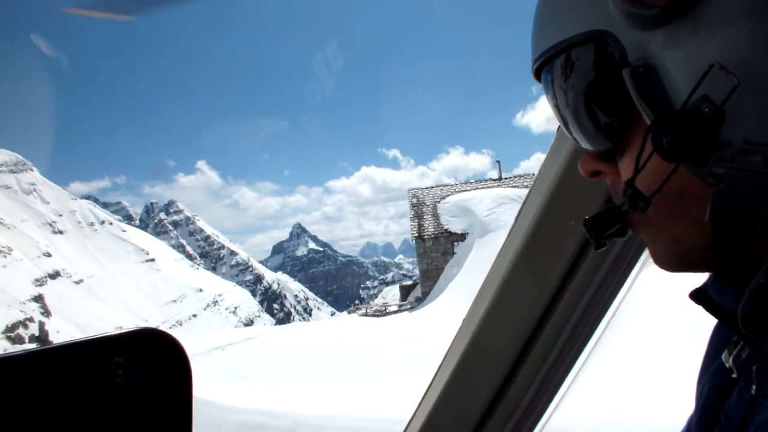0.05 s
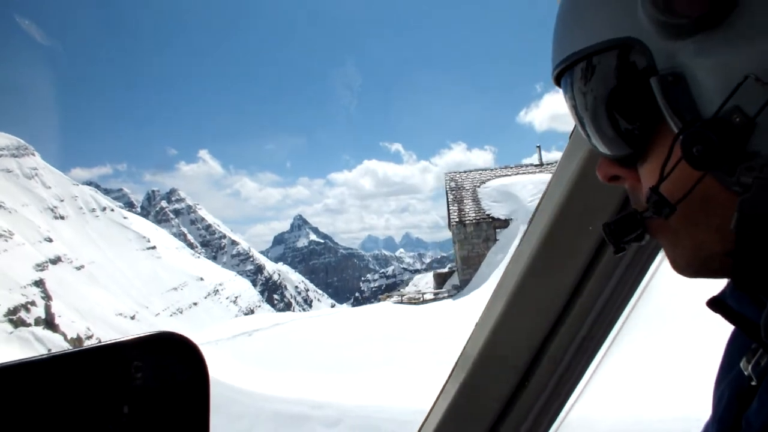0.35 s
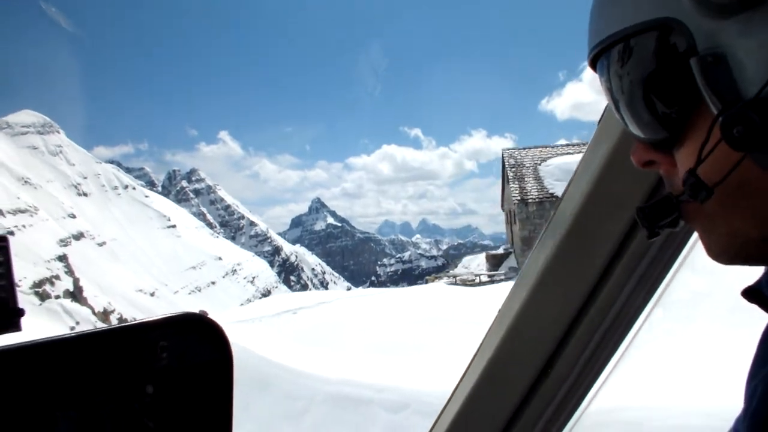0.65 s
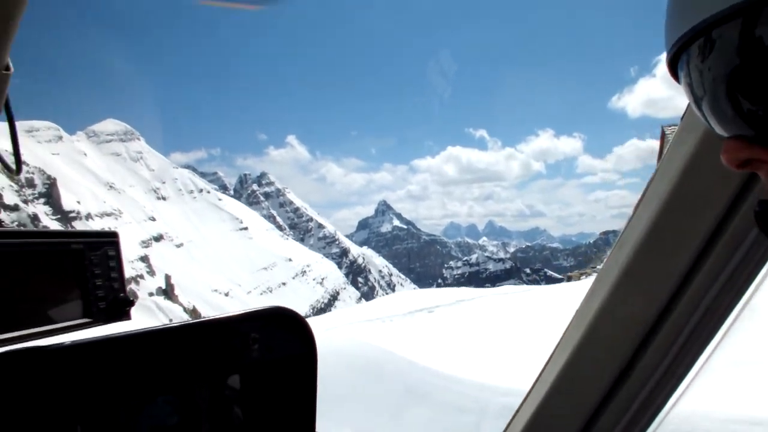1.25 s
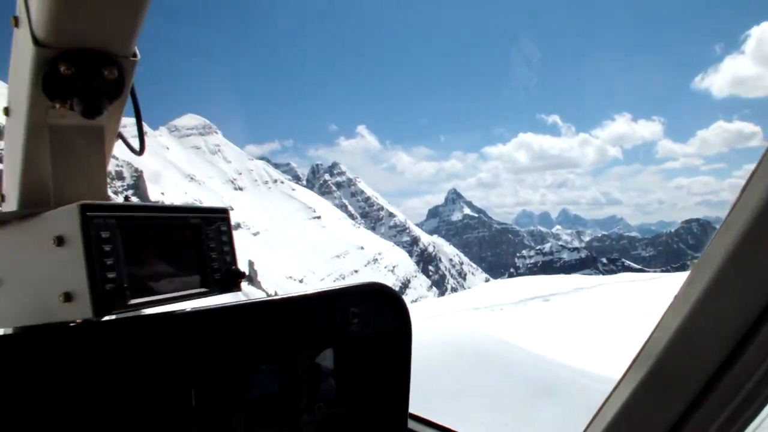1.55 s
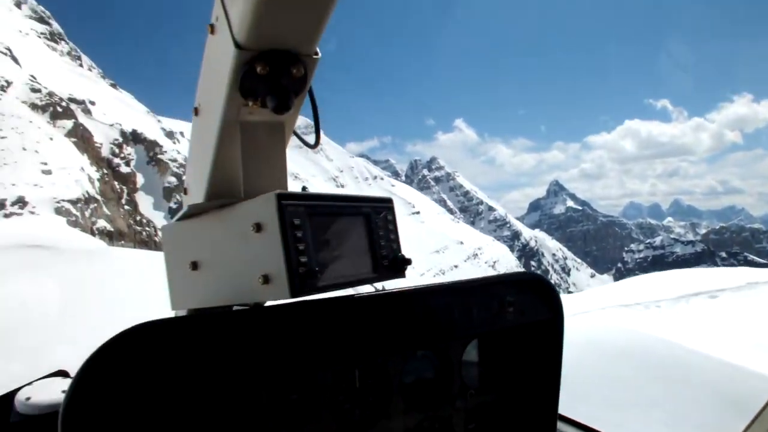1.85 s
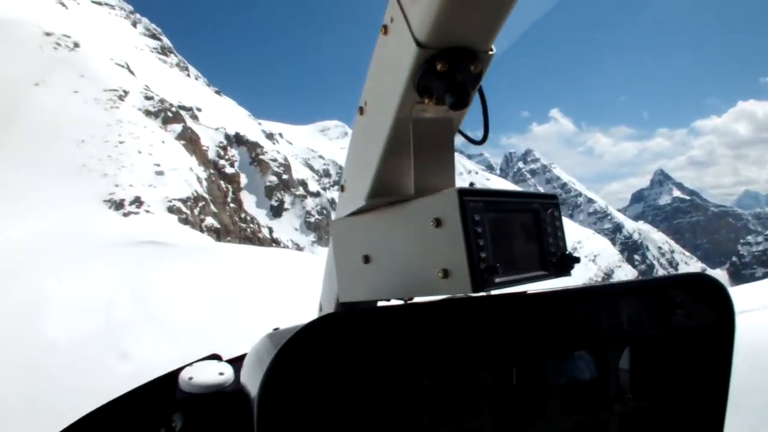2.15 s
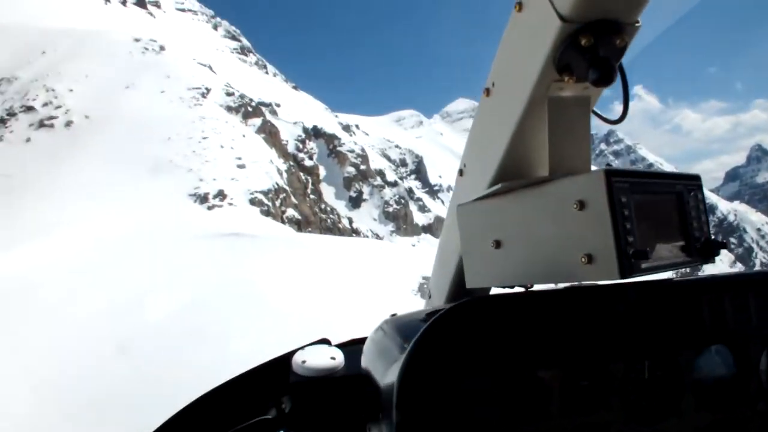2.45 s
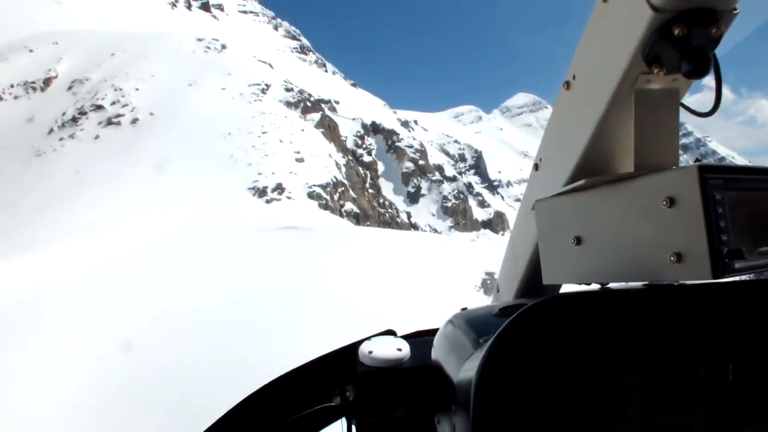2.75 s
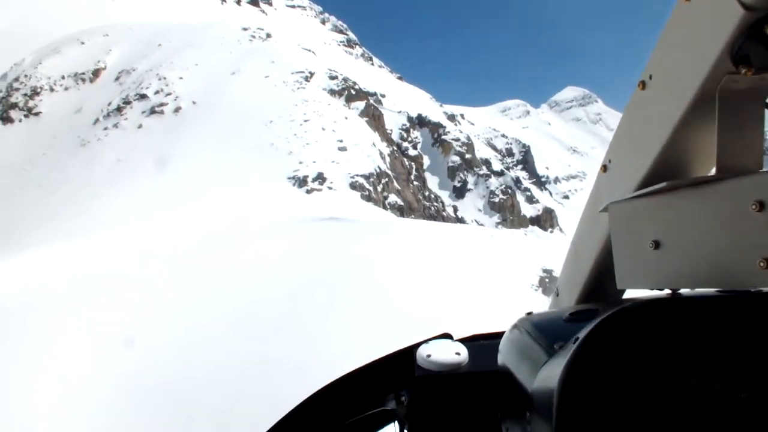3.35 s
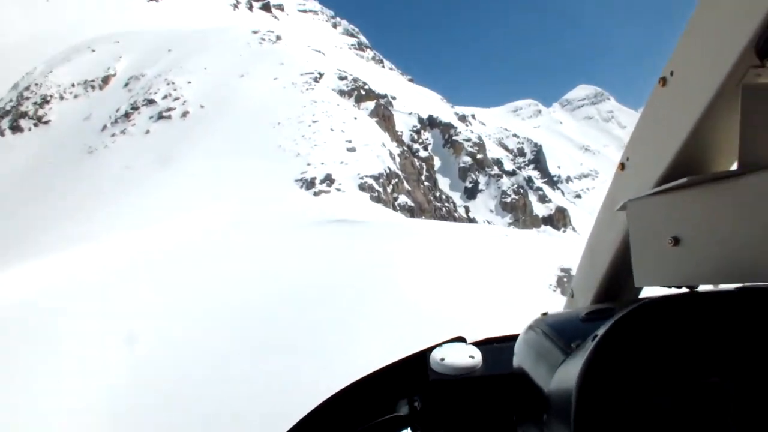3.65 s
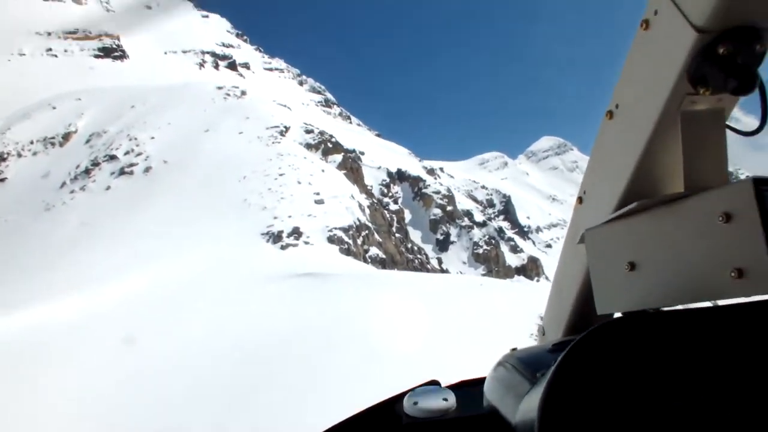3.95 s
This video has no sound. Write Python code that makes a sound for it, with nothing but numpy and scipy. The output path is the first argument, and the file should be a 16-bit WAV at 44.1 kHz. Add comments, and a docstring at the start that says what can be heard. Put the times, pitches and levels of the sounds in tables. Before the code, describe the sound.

A helicopter in flight, heard from inside the cabin: the rotor throbs steadily under a loud, pulsing roar of air and engine. Gear and turbine whines swell and fade, and something ticks faintly near the end.

```python
"""A helicopter's main rotor throbs, heard from inside the cabin in flight.
The tail rotor and drive shaft drone, gears whine and the turbine sings over a roar of air that
pulses with the blades. The whines swell and fade as the listener moves through standing waves,
the loud and quiet spots made by echoes in the cabin. Near the end, something ticks once."""
import sys
import numpy as np
from scipy import signal
from scipy.fft import rfft, irfft
from scipy.io import wavfile
from scipy.ndimage import uniform_filter1d

SR = 44100
rng = np.random.default_rng(int(sys.argv[2]) if len(sys.argv) > 2 else 0)


def log_audio(samples):
    """Write samples as a 16-bit WAV file to the path given in sys.argv[1]."""
    # one column per channel
    frames = np.atleast_2d(samples).T
    # limit to full scale, then quantise
    limited = np.clip(frames, -1, 1)
    pcm = np.round(limited * 32767).astype(np.int16)
    wavfile.write(sys.argv[1], SR, pcm)


N = 176400


def amp(db):
    """Turns decibels into a gain to multiply by."""
    return 10 ** (np.asarray(db) / 20)


def unit(x):
    """Scales a signal to an average strength (rms) of 1."""
    return x / np.sqrt(np.mean(abs(x) ** 2) + 1e-20)


def over_hz(points, hz):
    """Reads a table at the given frequencies, on a log scale."""
    f, value = np.transpose(points)
    return np.interp(np.log(hz + 1), np.log(f + 1), value)


def over_time(points):
    """Turns each column after the time column into one value per sample."""
    times, *columns = np.transpose(points)
    return np.array([np.interp(np.arange(N) / SR, times, c) for c in columns])


def drift(rate_hz):
    """Smooth random wandering, up to about the given rate."""
    hz = np.fft.rfftfreq(2 * N, 1 / SR)
    return unit(irfft(rfft(rng.standard_normal(2 * N)) / (1 + (hz / rate_hz) ** 4))[:N])


def shimmer(width_hz):
    """A random wobble in level and phase that blurs a tone to the given width."""
    knots = np.arange(0, N + 32, 32)
    noise = rng.standard_normal((len(knots), 2)) @ [1, 1j]
    hz = np.fft.fftfreq(len(knots), 32 / SR)
    smooth = np.fft.ifft(np.fft.fft(noise) / (1 + (2 * hz / width_hz) ** 2))
    return unit(np.interp(np.arange(N), knots, smooth))


def rotation(hz, clock):
    """A turning part: a point that circles in step with the clock, from a random start."""
    return np.exp(2j * np.pi * (hz * clock + rng.random()))


def drone(harmonics, hz, clock, gain_db, waver, waver_hz, left_db):
    """A spinning part hums at whole multiples of its pitch (harmonics), each wavering a little."""
    tone = sum(amp(db) * rotation(round(k) * hz, clock) * (1 + waver * shimmer(waver_hz))
               for k, db in harmonics)
    return np.sqrt(2) * amp(gain_db) * tone.real * amp([[left_db / 2], [-left_db / 2]])


BLADE_HZ = 13.85  # blades passing per second
# The throb as the listener moves: t/s, then level/dB of harmonics 2, 3 and 4
ROTOR_THROB = [(0, -55, -32, -42), (.45, -47, -39, -38), (.95, -32, -39, -43), (1.4, -52, -37, -33),
               (2.1, -33.5, -40, -32.5), (2.8, -33.5, -45, -46), (4, -39, -39, -40)]


def main_rotor(clock):
    """The big blades beat the air into a deep throb; harmonic 8 keeps one level setting."""
    harmonics = zip((2, 3, 4, 8), [*over_time(ROTOR_THROB), -44.5])
    return drone(harmonics, BLADE_HZ, clock, gain_db=-0.64, waver=0.2, waver_hz=10, left_db=2)


# The tail rotor's tones: harmonic number, level/dB
TAIL_HARMONICS = [(1, -47), (2, -31), (3, -44.5), (5, -46), (6, -45.5), (7, -49.5)]
# The shaft's octave grows as the listener turns: t/s, level/dB
SHAFT_OCTAVE_LEVEL = [(1.6, -38), (3.2, -33)]
# Both drones rise and fall as the listener moves: t/s, tail gain/dB, shaft gain/dB
DRONE_GAINS = [(0, -0.5, -4), (.28, -1, 0.5), (.45, 1.5, -1.5), (.66, -8, 2.5), (1, -.5, -2),
               (1.38, 0.5, 1), (1.53, 4.5, 0), (1.75, -7.5, 0.5), (1.93, 2.5, -1), (2.45, 0, -3),
               (2.85, 0, -.5), (3.35, -3, 2), (3.7, -1, 1.5), (4, -10, 1)]


def tail_rotor_and_shaft(clock, tail_hz=83.32, shaft_hz=105.28):
    """The tail rotor and the drive shaft spin fast, each with its own low drone."""
    tail_db, shaft_db = over_time(DRONE_GAINS)
    tail = drone(TAIL_HARMONICS, tail_hz, clock, tail_db, waver=0.22, waver_hz=6.2, left_db=2.5)
    shaft_harmonics = [(1, -29), (2, over_time(SHAFT_OCTAVE_LEVEL)[0])]
    shaft = drone(shaft_harmonics, shaft_hz, clock, shaft_db, waver=0.062, waver_hz=5.6, left_db=2.5)
    return tail + shaft


# Slow swells of the roar: t/s, body level/dB, treble level/dB, hiss level/dB
SLOW_SWELLS = [(0, -2.5, -1.5, -1.6), (.4, 0, 0.5, .3), (.8, 0, -1.5, 0), (1.3, 1, 2, 1),
               (1.8, 1.5, 1.8, 1.4), (2.65, -1.3, 1.5, -1.3), (3.2, 0, 2.9, 0), (4, 3, 4, -.2)]
# Where body, treble and hiss sit: f/Hz
SWELL_BANDS = [600, 2400, 9000]
# Brief surges of the roar: peak t/s, length/s, centre f/Hz, rise/dB
BRIEF_SURGES = [(0.385, 0.047, 695, 4), (0.555, 0.047, 730, 6.5), (0.662, .08, 300, 4),
                (1.276, 0.23, 310, 3.5), (1.61, 0.06, 686, 3.5), (2.943, 0.19, 600, 3.5),
                (3.422, 0.1, 350, 2), (3.818, 0.13, 874, 3), (3.921, 0.14, 260, 7.5)]


def roar_swell(hz, t, surge_octaves=0.91, rumble_hz=110):
    """How many dB the roar rises or falls at each pitch and time; the low rumble hardly swells."""
    times, *levels = np.transpose(SLOW_SWELLS)
    swell_db = 0
    for band, level in zip(np.eye(len(SWELL_BANDS)), levels):
        share = np.interp(np.log(hz + 1), np.log(SWELL_BANDS), band)
        swell_db += np.outer(share, np.interp(t, times, level - level.mean()))
    for peak_s, length_s, centre_hz, rise_db in BRIEF_SURGES:
        spread = np.exp(-(np.log2((hz + 1) / centre_hz) / surge_octaves) ** 2)
        swell_db += rise_db * np.outer(spread, np.exp(-(2 * (t - peak_s) / length_s) ** 2))
    return (hz ** 2 / (hz ** 2 + rumble_hz ** 2))[:, None] * swell_db


# The tone colour of the roar of air and engine: f/Hz, relative level/dB
ROAR_COLOUR = [(10, -16), (25, 0), (50, -0.5), (68, -26), (90, -3), (130, 3.5), (165, 0.5), (320, -1),
               (440, -6), (600, -4.5), (790, -4.5), (1000, -12), (1250, -13), (1500, -16), (2100, -16.5),
               (2450, -21), (3100, -28.5), (3900, -31.5), (5200, -42.5)]
# The thin hiss above it: f/Hz, relative level/dB
HISS_COLOUR = [(7000, -47.5), (9500, -48.4), (11000, -47), (13000, -44.7), (13900, -46.8), (15200, -49)]
# How alike left and right sound: f/Hz, likeness from 0 to 1
STEREO_LIKENESS = [(120, .998), (270, .95), (740, 0.89), (1220, 0.24), (2000, 0.09), (3300, 0.37),
                   (5500, .5), (7500, 0.4), (10000, .42), (14000, 0.85)]
# How far the left wave runs ahead of the right: f/Hz, lead/radians
LEFT_LEAD = [(20, 0), (1000, .05), (1500, -.3), (2400, -3), (6500, -2.9), (8200, -1.1), (9300, -.4),
             (15000, 0)]
# How much louder the left side is: f/Hz, left minus right level/dB
LEFT_BALANCE = [(100, 2.2), (800, 1.5), (1300, 1.5), (2100, -1), (2900, 0.5), (3600, 3), (4800, 3.5),
                (6500, .5), (12000, 0)]


def rushing_air(patchy_db=0.48):
    """Swirling air makes noise, built here on a grid of pitches and moments."""
    hz = np.fft.rfftfreq(2048, 1 / SR)
    t = np.arange(N // 512 + 5) * 512 / SR
    a, b, c, d, patches = rng.standard_normal((len(t), len(hz), 5)).T
    left, unrelated = a + 1j * b, c + 1j * d
    likeness = np.clip(over_hz(STEREO_LIKENESS, hz), 0, 1)[:, None]
    right = likeness * left + np.sqrt(1 - likeness ** 2) * unrelated
    right *= np.exp(-1j * over_hz(LEFT_LEAD, hz))[:, None]
    balance = amp(over_hz(LEFT_BALANCE, hz) / 2)[:, None]
    patches = unit(uniform_filter1d(uniform_filter1d(patches, size=18, axis=0), size=6, axis=1))
    level_db = over_hz(ROAR_COLOUR + HISS_COLOUR, hz)[:, None] + roar_swell(hz, t)
    level_db += patchy_db * patches / (1 + hz[:, None] / 9000)  # random louder and softer spots
    grid = np.array([left * balance, right / balance]) * amp(level_db)
    return unit(signal.istft(grid, nperseg=2048, noverlap=1536)[1][:, :N])


def roar(clock, level_db=-27, flutter_db=0.78, flutter_hz=39.8):
    """The rushing air flutters and pulses with the blades; its rumble and hiss pulse less."""
    air = rushing_air()
    rumble = signal.sosfiltfilt(signal.butter(2, 50, fs=SR, output="sos"), air)
    hiss = air - signal.sosfiltfilt(signal.butter(2, 3000, fs=SR, output="sos"), air)
    blade = rotation(BLADE_HZ, clock)
    chop = 1 + (0.12 * blade + 0.089 * blade ** 2 + 0.059 * blade ** 4).real
    pulsing = chop * amp(flutter_db * drift(flutter_hz)) - 1
    return amp(level_db) * (air + pulsing * (air - rumble - 0.43 * hiss))


def whine(hz, db, clock, echo, blur_hz, lead=0):
    """A steady tone plus wavering cabin echoes that differ between left and right."""
    direct = np.exp(1j * lead * np.array([[1], [0]]))
    echoes = echo * np.array([shimmer(blur_hz), shimmer(blur_hz)])
    paths = (direct + echoes) / np.sqrt(1 + echo ** 2)
    return np.sqrt(2) * amp(db) * (rotation(hz, clock) * paths).real


# The lowest gear whine: t/s, left level/dB, right level/dB
MESH_LEVELS = [(0, -39, -49), (.5, -41, -54), (.8, -38, -42.5), (1.7, -34, -36.5), (2.1, -42, -42),
               (2.8, -49, -40.5), (3.3, -42, -37.5), (4, -45, -41)]
# Its third harmonic: t/s, left level/dB, right level/dB
THIRD_LEVELS = [(0, -66, -42.5), (.8, -74, -49.5), (1.4, -49, -45), (1.7, -43, -48), (2.1, -44, -47.5),
                (2.6, -46.5, -40), (3.1, -48, -42.5), (3.55, -40, -41), (4, -52, -51)]
# The bevel (cone-shaped) gear: t/s, left level/dB, right level/dB
BEVEL_LEVELS = [(0, -49, -49), (.7, -51, -45.5), (1.2, -41.5, -54), (1.6, -42.5, -55), (2, -40, -41),
                (2.6, -58, -48.5), (3, -48, -63), (4, -66, -64)]
# The pinion (small gear): t/s, left level/dB, right level/dB
PINION_LEVELS = [(0, -57, -53), (.47, -49, -40), (.58, -61, -58), (.93, -62, -53), (1.03, -46, -44.5),
                 (1.45, -52, -37), (1.62, -60, -49), (1.88, -47, -47), (2.1, -56, -44.5), (2.62, -61, -48),
                 (2.71, -44, -40.5), (3.55, -48, -52)]
# Turning swings the two tones near 1.6 kHz between the sides: t/s, left lead/radians
GEAR_SWING = [(1.3, -2), (2, 0.07)]
# Faint whines of gears and accessories: f/Hz, level/dB
FAINT_WHINES = [(825, -46.5), (1037.5, -52), (2444.5, -56), (2588, -63)]
# One accessory's whine drops away as the listener turns: t/s, level/dB
ACCESSORY_LEVEL = [(1.8, -49), (2, -59)]


def gearbox(clock, mesh_hz=518.75, bevel_hz=1619, pinion_hz=2000.3, accessory_hz=2208):
    """Gear teeth meet (mesh) so fast that they sing: four loud whines and several faint ones."""
    swing = over_time(GEAR_SWING)[0]
    gears = whine(mesh_hz, over_time(MESH_LEVELS), clock, echo=0.27, blur_hz=11)
    gears += whine(3 * mesh_hz, over_time(THIRD_LEVELS), clock, echo=0.2, blur_hz=20, lead=swing)
    gears += whine(bevel_hz, over_time(BEVEL_LEVELS), clock, echo=0.68, blur_hz=28, lead=swing)
    gears += whine(pinion_hz, over_time(PINION_LEVELS), clock, echo=0.42, blur_hz=30, lead=-1.82)
    for hz, db in FAINT_WHINES + [(accessory_hz, over_time(ACCESSORY_LEVEL))]:
        gears += whine(hz, db, clock, echo=0.82, blur_hz=9.6, lead=over_hz(LEFT_LEAD, hz))
    return gears


# The turbine's tones: harmonic number, level/dB
TURBINE_HARMONICS = [(1, -67.5), (2, -80.5), (3, -84)]


def turbine(hz=3174):
    """The turbine spins at a steady speed and sings one high note."""
    t = np.arange(N) / SR
    return sum(whine(round(k) * hz, db, t, echo=0.54, blur_hz=6.1, lead=-0.76)
               for k, db in TURBINE_HARMONICS)


# The compressor's pitch follows the demand for power: t/s, f/Hz
WHISTLE_PITCH = [(0, 14500), (.55, 14635), (1, 14610), (1.7, 14480), (2.1, 14450), (2.8, 14310),
                 (3.3, 14420), (3.75, 14490), (4, 14420)]
# Its whistle swells and fades: t/s, gain/dB
WHISTLE_GAIN = [(0, -4), (.7, 0), (1.1, -4), (1.3, 6), (1.7, 3), (2.9, 1), (3.6, 3), (4, -2)]
# Two thin whines locked to it: fraction of the whistle's pitch
THIN_RATIOS = [.2775, .3522]
# Their strength before the fade: level/dB
THIN_LEVELS = [-71.5, -77]
# Their shared fade: t/s, gain/dB
THIN_FADE = [(.4, -0.5), (1.2, -4)]


def compressor(core_db=-72, fuzz_db=-75, wide_fuzz_db=-73):
    """The engine's air compressor spins out two thin whines and a very high, fuzzy whistle."""
    cycles = np.cumsum(over_time(WHISTLE_PITCH)[0]) / SR
    whines = sum(whine(ratio, db + over_time(THIN_FADE), cycles, echo=0.55, blur_hz=8.9)
                 for ratio, db in zip(THIN_RATIOS, THIN_LEVELS))
    fuzz = np.array([amp(fuzz_db) * shimmer(80) + amp(wide_fuzz_db) * shimmer(300) for _ in range(3)])
    each_side, shared = fuzz[:2], fuzz[2]
    whistle = (np.exp(2j * np.pi * cycles) * (amp(core_db) + 0.7 * each_side + shared)).real
    return whines + amp(over_time(WHISTLE_GAIN)) * whistle


def tick(start_s=3.424, level_db=-40, decay_s=0.004, hz=2100):
    """Something in the cabin ticks once: a short, dull burst of noise."""
    age = np.arange(N) / SR - start_s
    band = signal.butter(2, [hz / 2, hz * 1.7], "band", fs=SR, output="sos")
    burst = unit(signal.sosfilt(band, rng.standard_normal((2, N))))
    return amp(level_db) * burst * (age > 0) * np.exp(-abs(age) / decay_s)


# The rotor runs a little fast or slow: t/s, change from normal speed/%
ROTOR_SPEED = [(0, -0.12), (.6, -0.18), (1.2, -0.072), (1.7, 0.0053), (2.3, 0.062), (3, -0.0057),
               (3.4, -0.024), (4, 0.042)]


def scene():
    """Rotors, shaft, gears and the roar's pulsing share one clock; the engine keeps its own time."""
    clock = np.cumsum(1 + over_time(ROTOR_SPEED)[0] / 100) / SR
    geared = main_rotor(clock) + tail_rotor_and_shaft(clock) + roar(clock) + gearbox(clock)
    return geared + turbine() + compressor() + tick()


def record(dry, cutoff_hz=15250):
    """Cuts away the very highest treble."""
    lowpass = signal.firwin(511, cutoff_hz, window=("kaiser", 9), fs=SR)
    return signal.oaconvolve(dry, lowpass[None], "same")


dry = scene()
out = record(dry)
log_audio(out)
```